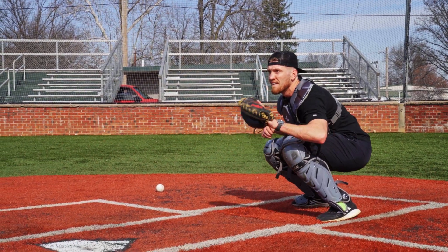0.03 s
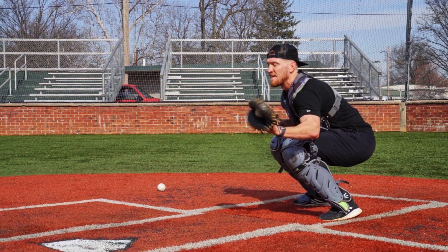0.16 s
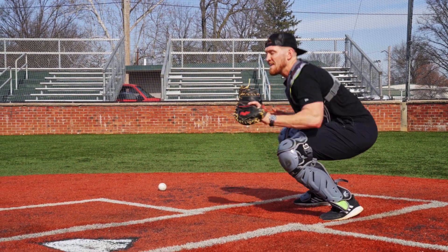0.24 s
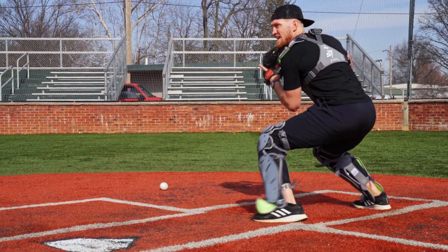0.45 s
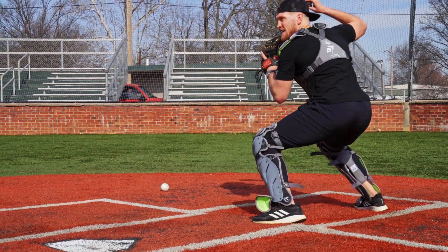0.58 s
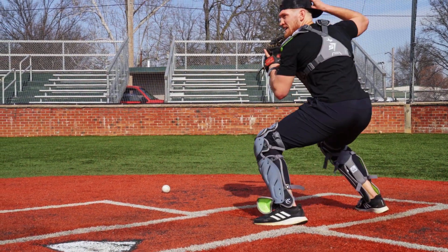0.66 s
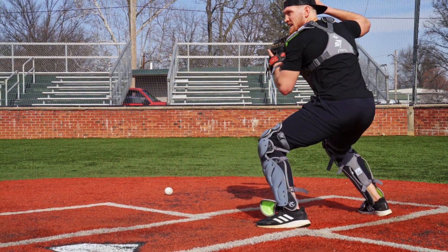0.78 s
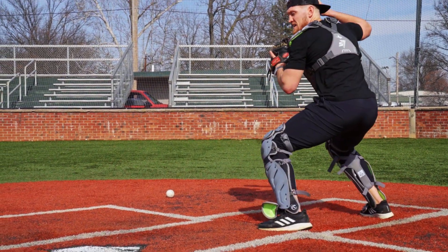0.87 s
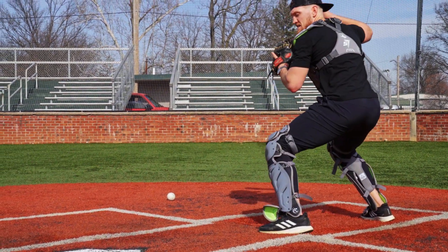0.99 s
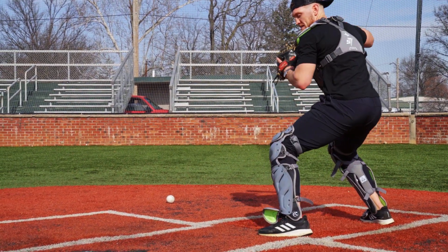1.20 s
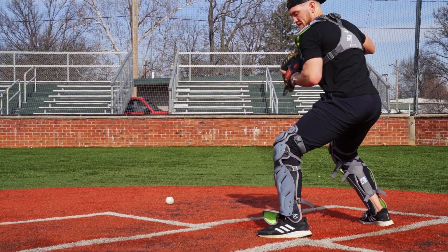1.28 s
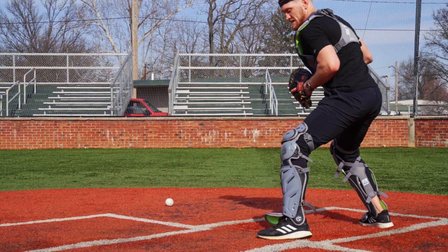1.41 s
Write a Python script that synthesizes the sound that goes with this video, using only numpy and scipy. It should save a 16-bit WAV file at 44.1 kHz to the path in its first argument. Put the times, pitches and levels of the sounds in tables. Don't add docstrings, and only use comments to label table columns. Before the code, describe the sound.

A hard ball pops sharply into a leather mitt, then body thumps and gear clatter outdoors.

```python
import sys
import numpy as np
from scipy import signal
from scipy.fft import rfft, irfft
from scipy.io import wavfile
from scipy.ndimage import uniform_filter1d

SR = 44100
rng = np.random.default_rng(int(sys.argv[2]) if len(sys.argv) > 2 else 0)


def master_out(mix):
    frames = np.transpose(np.atleast_2d(mix))
    ceiling = np.clip(frames, -1, 1)
    pcm = np.round(ceiling * 32767).astype(np.int16)
    wavfile.write(sys.argv[1], SR, pcm)


def undo_db(level):
    steps = np.asarray(level, float) / 20
    return 10 ** steps


N = 63945


def evened(x):
    return x / np.sqrt(np.mean(x ** 2) + 1e-20)


def curve(points):
    s, v = np.transpose(points)
    return np.interp(np.arange(N) / SR, s, v)


def coloured(x, points):
    f, v = np.transpose(points)
    hz = np.fft.rfftfreq(len(x), 1 / SR)
    gain = undo_db(np.interp(np.log(hz + 1), np.log(f + 1), v, left=-60, right=-90))
    return irfft(rfft(x) * gain, len(x))


def add(mix, s, sound):
    part = mix[round(s * SR):][:len(sound)]
    part += sound[:len(part)]


def resonate(x, hz, width):
    turn = np.exp(2j * np.pi * hz * np.arange(len(x)) / SR)
    r = np.exp(-np.pi * width / SR)
    return 2 * (turn * signal.lfilter([1 - r], [1, -r], x / turn)).real


def noise_band(x, hz, width, second_width=None):
    return evened(resonate(resonate(x, hz, width), hz, second_width or width))


def flicker(size, depth_db):
    drift = uniform_filter1d(uniform_filter1d(rng.standard_normal(N), size), size)
    return undo_db(depth_db * evened(drift))


def outdoors():
    # (frequency [Hz], density [dB per Hz])
    air_colour = [(15, -43), (30, -7.5), (60, -9.5), (120, -14), (230, -27), (900, -38.5), (1400, -42.5),
                  (3500, -58), (15800, -73.5)]
    # (time [s], pitch [Hz], level [dB])
    engine = np.array([(0, 81.8, -52.5), (.2, 79.05, -50), (.45, 79.5, -44), (.62, 78.9, -43),
                       (0.781, 79.5, -58.5), (0.899, 82.5, -49), (0.999, 79.23, -52.5), (1.121, 81.7, -43),
                       (1.27, 79, -57.5), (1.45, 79.9, -42.5)])
    # (frequency [Hz], width [Hz], level [dB])
    hums = [(134.3, 34, -55), (202, 155, -63), (106.9, 18, -57.5)]
    # (frequency [Hz], width [Hz], level [dB])
    whines = [(963, 18.6, -74), (2700, 34, -85)]
    # (time [s], level [dB])
    approach = [(0, -16), (.2, 4.5), (.8, 4.5), (1.45, 6.5)]
    # (frequency [Hz], level [dB])
    road_colour = [(300, -18), (500, 0), (900, 4), (1400, -9.5), (3000, -26.5)]
    air_noise, band_noise, road_noise = rng.standard_normal((3, N))

    air = undo_db(-48) * evened(coloured(air_noise, air_colour))
    phase = 2 * np.pi * np.cumsum(curve(engine[:, :2])) / SR
    drone = np.sqrt(2) * undo_db(curve(engine[:, ::2])) * np.sin(phase)
    hum = sum(undo_db(db) * noise_band(band_noise, hz, w) for hz, w, db in hums)
    whine = sum(undo_db(db) * noise_band(band_noise, hz, w) for hz, w, db in whines)
    road = undo_db(-68.5) * evened(coloured(road_noise, road_colour))
    return air + drone + hum + undo_db(curve(approach)) * (whine + road)


def rustle():
    # (time [s], level [dB])
    motion = [(0, -66), (.05, -68), (.07, -70), (.16, -73), (.21, -66), (.25, -56.5), (.305, -59),
              (.33, -57.5), (.39, -61), (.44, -57.5), (.50, -58.5), (.54, -53), (.575, -59), (.61, -54.5),
              (.70, -66), (.95, -76.5), (1.22, -72.5), (1.37, -58), (1.45, -62.5)]
    # (frequency [Hz], density [dB per Hz])
    cloth_colour = [(150, -4.5), (250, -1), (638, -6), (900, -8.5), (2600, -15), (3090, -15.5), (7360, -20),
                    (9550, -18.5), (15800, -25)]
    # (time [s], level [dB])
    shake = [(.2, -93), (.28, -52.5), (.32, -81), (.40, -57.5), (.43, -42), (.475, -52), (.49, -43.5),
             (.53, -38), (.548, -43.5), (.60, -48.5), (.70, -51.5), (.80, -59), (1.3, -70.5), (1.45, -52.5)]
    # (frequency [Hz], level [dB])
    scuff_colour = [(100, 6), (300, -3.5), (600, 2.5), (1300, -7), (2200, -12), (4000, -27.5)]
    # (time [s], length [s], level [dB], frequency [Hz])
    swishes = [
        (0.024, 0.031, -68, 12600),
        (2.1, .02, -63, 5000),
        (0.481, 0.0076, -53.5, 830),
        (0.222, 0.02, -68.5, 12500),
        (1.377, 0.0079, -59, 2200),
        (0.34, 0.0087, -55, 9000),
        (0.66, 0.0077, -55, 9700),
        (0.82, 0.0036, -71, 10500),
        (1.238, 0.0053, -72, 9000),
        (1.365, 0.024, -64, 8700),
    ]
    # (time [s], length [s], level [dB], frequency [Hz])
    squeaks = [
        (.365, .005, -61, 8900),
        (.365, .006, -63, 10700),
        (.762, .004, -72, 8800),
        (.762, .004, -74, 10600),
    ]
    t = np.arange(N) / SR
    cloth_noise, scuff_noise, strap_noise, grit_noise = rng.standard_normal((4, N))

    grit = 1 + .12 * uniform_filter1d((abs(grit_noise) > 3.1) * 20., size=40)
    cloth = evened(coloured(cloth_noise * grit, cloth_colour))
    cloth *= flicker(size=250, depth_db=1.35) * undo_db(curve(motion) + 4.5)
    scuff = evened(coloured(scuff_noise, scuff_colour))
    scuff *= flicker(size=120, depth_db=2.0) * undo_db(curve(shake))
    out = cloth + scuff
    for s, w, db, hz in swishes:
        swell = np.exp(-.5 * ((t - s) / w) ** 2)
        out += undo_db(db) * swell * noise_band(strap_noise, hz, 2500, 2200)
    for s, w, db, hz in squeaks:
        swell = np.exp(-.5 * ((t - s) / w) ** 4)
        out += undo_db(db) * swell * noise_band(strap_noise, hz, 400)
    return out


def ticks():
    # (time [s], peak [dB], frequency [Hz])
    clicks = [(.008, -53.5, 13650), (.027, -54, 13400), (.046, -52, 14800), (.160, -57, 14000),
              (.211, -58, 4800), (.3145, -42, 5440), (.4025, -56, 7070), (.4285, -46, 7400),
              (.4435, -36.5, 2200), (.5265, -33, 2470), (.541, -42, 2244), (.548, -51, 1790),
              (.558, -43, 6070), (.6555, -54, 5500), (.6555, -51, 13800), (.6225, -48, 10500),
              (1.311, -54, 6500), (1.431, -50, 7500), (1.431, -57, 4800), (0.216, -54, 13100),
              (.2432, -34, 2470), (0.319, -39, 2010), (.326, -41.5, 3670), (.429, -49, 3000),
              (.4612, -36, 1380), (.5285, -64, 1800), (0.629, -41.5, 2280), (0.4438, -41.5, 7100),
              (.5245, -50, 2430), (.558, -42, 10500), (.558, -41, 13000), (0.596, -41, 8850),
              (.6225, -45.5, 3940), (.6555, -56, 9000), (.671, -66, 14000), (.766, -76, 6180),
              (0.7713, -49, 12100), (0.8097, -41.5, 2700), (1.127, -63, 4530), (1.137, -62, 8100),
              (1.145, -63, 4960), (1.164, -54.5, 9000), (1.165, -56.5, 4300), (1.164, -63, 13000),
              (.690, -49.5, 2243), (1.195, -59, 9500), (1.302, -58, 11950), (1.326, -56, 12900),
              (1.43, -44, 13500)]
    longest_s, most_cycles = .0028, 6
    peak_s, wide_db = .0005, -15
    out, t = np.zeros(N), np.arange(1024) / SR
    for s, db, hz in clicks:
        noise = rng.standard_normal(1024)
        rough = noise_band(noise, hz, .5 * hz)
        ringing = np.sqrt(2) * np.cos(2 * np.pi * hz * t)
        tone = .25 * rough + .75 * ringing + 1.25 * undo_db(wide_db) * noise
        t60 = min(longest_s, most_cycles / hz)
        envelope = undo_db(db - 60 * abs(t - peak_s) / t60)
        add(out, s - peak_s, envelope * np.sqrt(longest_s / t60) * tone)
    return out


def knocks():
    # (time [s], peak [dB], frequency [Hz], ring [s])
    hits = [(0.214, -53, 1188, 0.0035), (.319, -41.5, 1310, 0.0012), (0.332, -34.5, 383, 0.0029),
            (.4258, -30, 492, 0.0017), (.4295, -21, 583, 0.0025), (0.426, -36, 228, 0.0105),
            (.428, -33, 763, 0.0025), (.4335, -28.5, 496, 0.0035), (0.4614, -25.5, 630, 0.0012),
            (.483, -37, 706, 0.0023), (.497, -35.5, 815, 0.0024), (.516, -52, 670, 0.006),
            (.5225, -36, 610, 0.002), (.5265, -28, 400, 0.0041), (.529, -31, 760, 0.0023),
            (.532, -29.5, 822, 0.003), (0.5594, -37, 322, 0.0071), (0.576, -53, 178, 0.01),
            (.592, -41.5, 860, 0.0043), (0.606, -41.5, 175, 0.031), (0.663, -48.5, 266, 0.0077),
            (.308, -42, 268.5, 0.019), (.729, -46, 483, 0.0061)]
    out, t = np.zeros(N), np.arange(1024) / SR
    for s, db, hz, ring in hits:
        envelope = np.e * t / ring * 2 * np.exp(-2 * t / ring)
        add(out, s, undo_db(db) * envelope * np.sin(2 * np.pi * hz * t))
    return out


def pushes():
    # (time [s], width [s], pressure [full scale, negative = pull])
    thumps = [(0.1862, 0.013, 0.051), (0.207, 0.0022, -0.022), (0.2434, 0.0024, 0.05),
              (0.2813, 0.0013, 0.273), (0.285, 0.003, -0.063), (0.3376, 0.0019, 0.077),
              (0.319, 0.016, -0.11), (0.375, 0.008, -0.061), (0.404, 0.012, -0.094), (0.4192, 0.008, 0.159),
              (0.4386, 0.008, 0.119), (0.462, 0.008, 0.092), (0.4829, 0.002, -0.024),
              (0.499, 0.0051, -0.022), (0.5428, 0.0053, 0.135), (0.562, 0.0066, -0.049),
              (0.572, 0.006, -0.042), (0.6306, 0.0028, -0.022), (0.6525, 0.007, 0.066),
              (0.665, 0.0062, 0.041), (0.714, 0.0257, -0.064)]
    # (time [s], width [s], pressure [full scale, negative = pull])
    more_thumps = [
        (.369, .0025, -.035),
        (.561, .0008, .04),
        (.2535, .002, .08),
    ]
    t = np.arange(N) / SR
    pressure = sum(p * np.exp(-.5 * ((t - s) / w) ** 2) for s, w, p in list(thumps) + list(more_thumps))
    return signal.lfilter(*signal.butter(1, 5, "high", fs=SR), pressure)


def pop():
    # (frequency [Hz], level [dB], t60 [s])
    leather_modes = [(510, -10.5, 0.1), (800, -3.5, 0.012), (1039, -5, 0.021), (1323, -15.5, 0.034),
                     (1735, -23.5, 0.038), (2207, -21, 0.046), (2410, -23.5, 0.03), (2756, -19.5, 0.022),
                     (3280, -15.5, 0.014)]
    # (frequency [Hz], level [dB], t60 [s])
    lace_modes = [(4220, -20, 0.012), (5650, -12.5, 0.011), (6920, -2.5, 0.0088), (9070, 9.5, 0.00083),
                  (12500, -16.5, 0.002055), (14500, 3, 0.0011)]
    # (time after contact [s], strength [ratio, negative = inward])
    cracks = [
        (.0001, -0.15),
        (.00025, -.22),
        (.00084, .3),
        (.00102, .4),
        (.0016, -0.2),
        (.0026, .08),
        (.0045, -.04),
    ]
    # (frequency [Hz], level [dB])
    slap_colour = [(600, -8), (1500, 0), (4000, -3), (8000, -8), (12000, -12), (15000, -20), (15900, -60)]
    rise_s, graze_s, rebound_s, seat_s = .00012, .0004, .00086, .00102
    pocket_hz, closing_s = 356, .0057
    t, out = np.arange(2048) / SR, np.zeros(2048)

    touch = .25 * np.minimum(t / rise_s, 1) + .1 * (t > rebound_s)
    sag = 1 - .25 * (t - graze_s) / (rebound_s - graze_s)
    squeeze = .65 * np.clip((t - graze_s) / rise_s, 0, 1) * sag * (t < rebound_s)
    out -= undo_db(-1) * (t < seat_s) * (touch + squeeze)

    closing = np.exp(-(t / closing_s) ** 4.9)
    leather = sum(undo_db(db - 60 * t / t60) * np.sin(2 * np.pi * hz * t) for hz, db, t60 in leather_modes)
    pocket = np.sin(2 * np.pi * pocket_hz * t)
    add(out, seat_s, (undo_db(-4.5) * closing * (pocket + leather))[:1900])

    lace = sum(undo_db(db - 60 * t / t60) * np.sin(2 * np.pi * hz * t) for hz, db, t60 in lace_modes)
    for s, strength in cracks:
        add(out, s, 0.24 * strength * lace[:1500])

    slap = evened(coloured(rng.standard_normal(2048), slap_colour))
    slap *= undo_db(-29 - 60 * t / .024)
    return out + slap * np.minimum(t / seat_s, 1)


def scene():
    mix = outdoors() + rustle() + ticks() + knocks() + pushes()
    mix = signal.oaconvolve(mix, signal.firwin(255, 15900, fs=SR), "same")
    add(mix, .2474, pop())
    return mix[None]


def band_limit(x):
    return signal.sosfilt(signal.butter(12, 17050, fs=SR, output="sos"), x)


def record(dry):
    ceiling, knee = np.where(dry > 0, .59, .7), 8
    clipped = dry / (1 + abs(dry / ceiling) ** knee) ** (1 / knee)
    capsule = signal.firwin(41, 16400, fs=SR)[None]
    clipped = signal.oaconvolve(clipped, capsule, "same")
    sagged = signal.lfilter(*signal.butter(1, 20, "high", fs=SR), clipped)
    return band_limit(sagged)


dry = scene()
out = record(dry)
master_out(out)
```